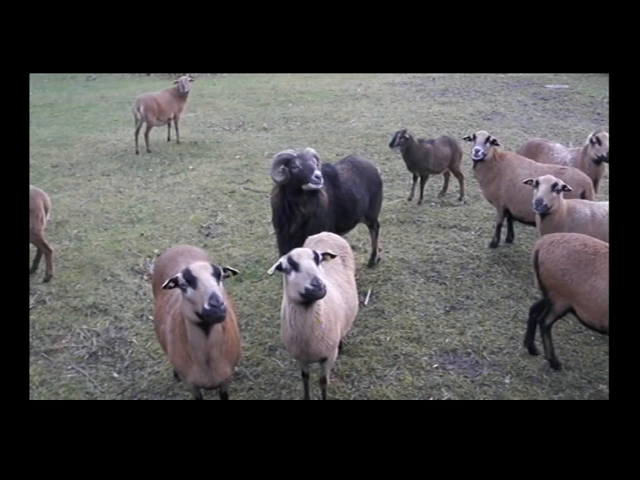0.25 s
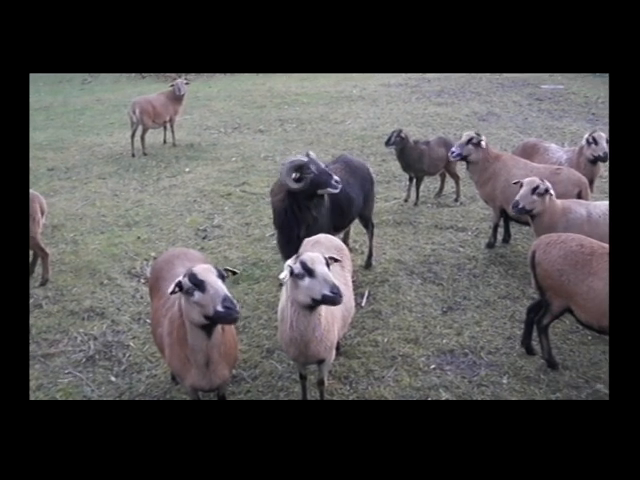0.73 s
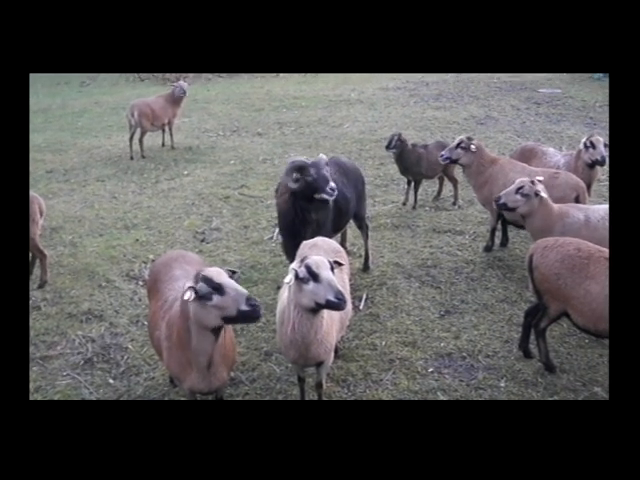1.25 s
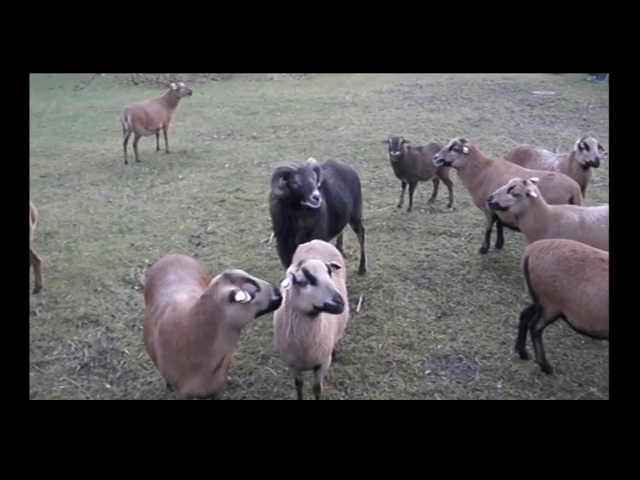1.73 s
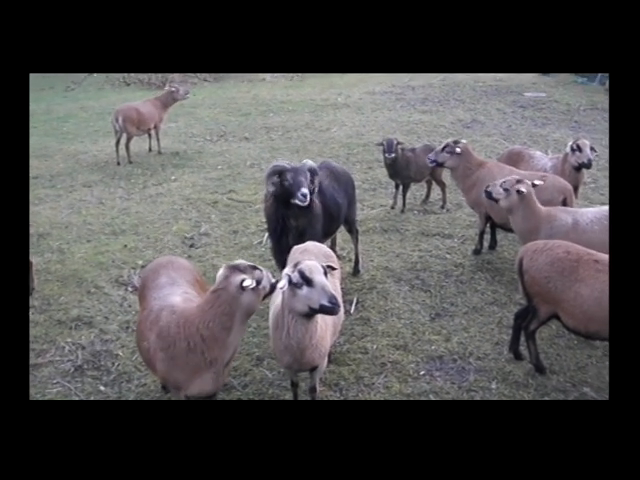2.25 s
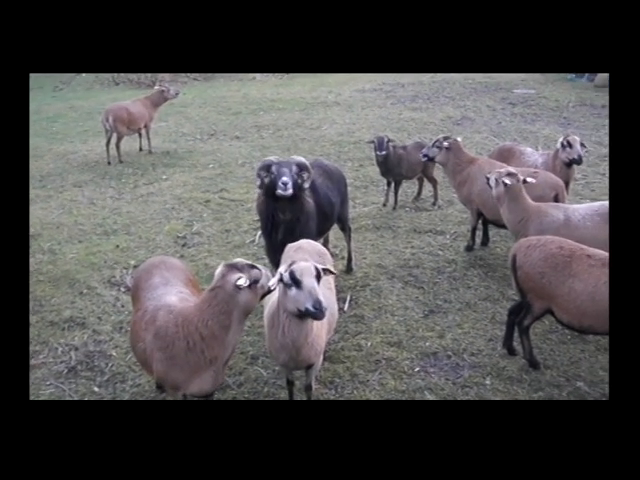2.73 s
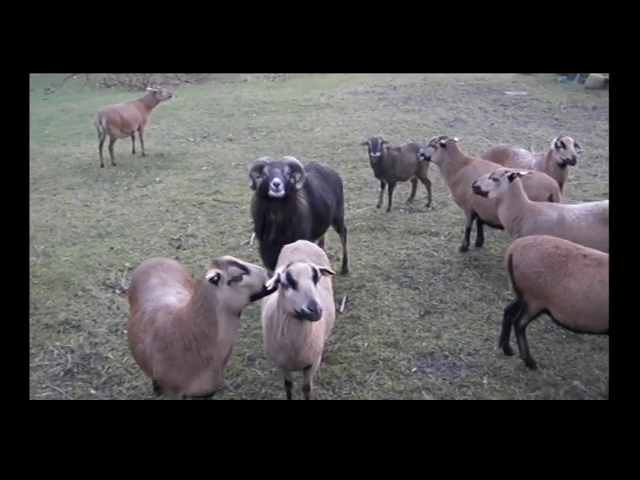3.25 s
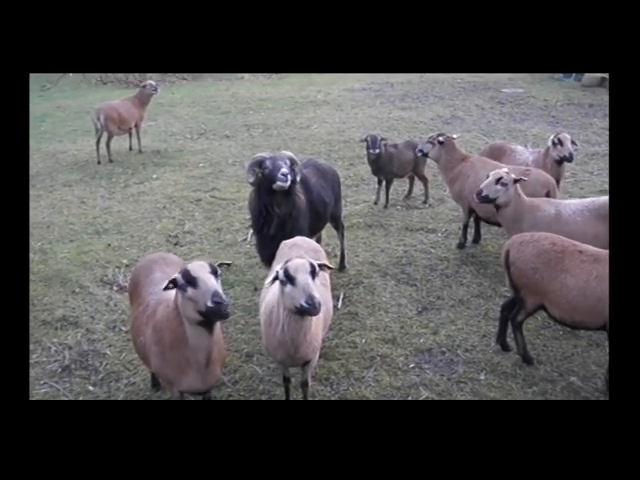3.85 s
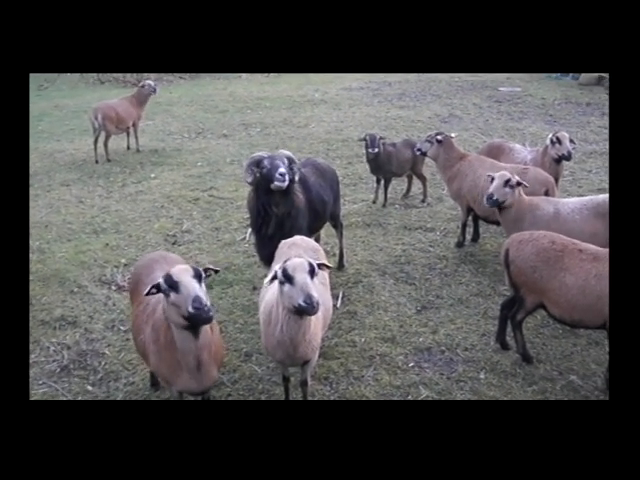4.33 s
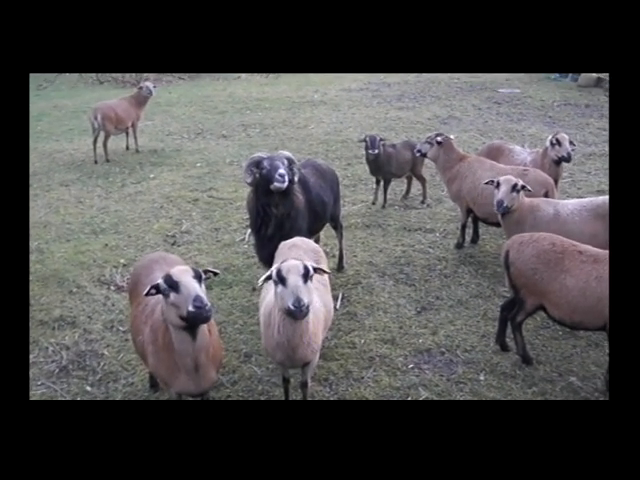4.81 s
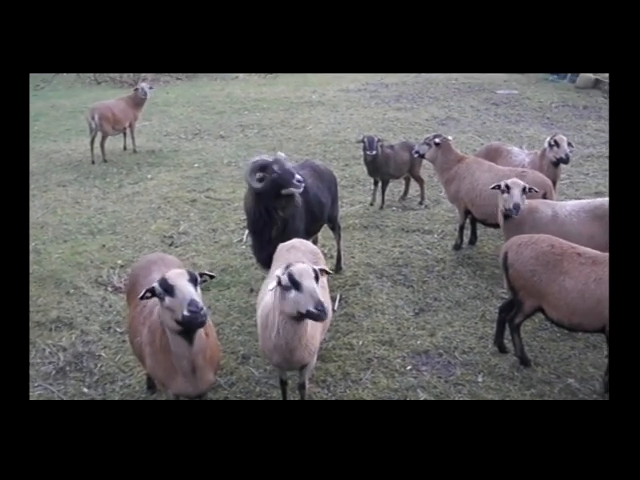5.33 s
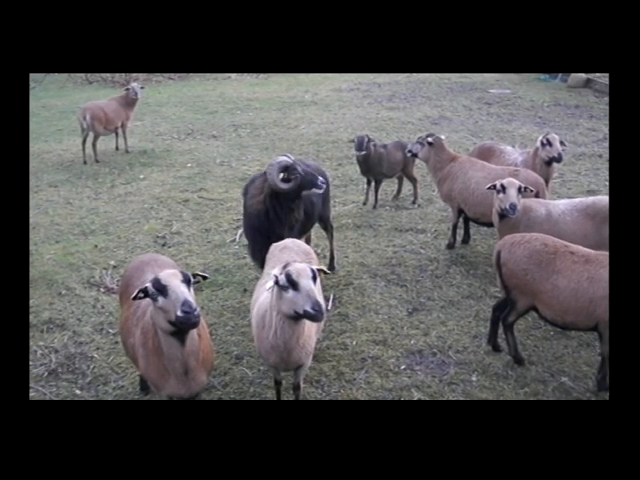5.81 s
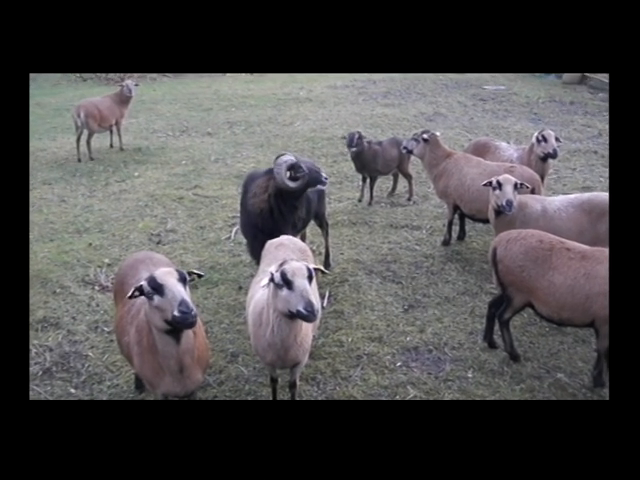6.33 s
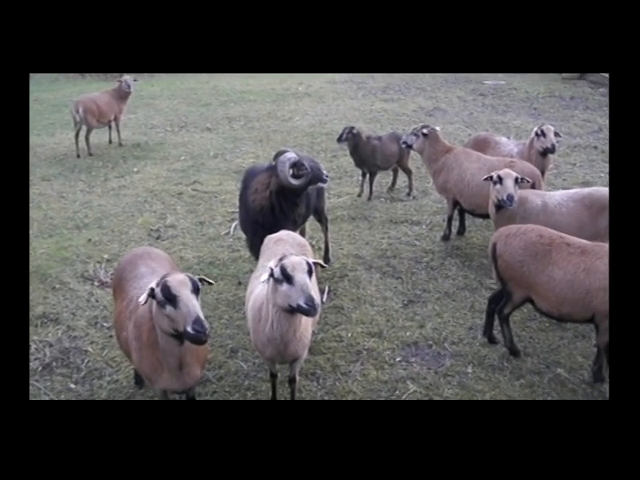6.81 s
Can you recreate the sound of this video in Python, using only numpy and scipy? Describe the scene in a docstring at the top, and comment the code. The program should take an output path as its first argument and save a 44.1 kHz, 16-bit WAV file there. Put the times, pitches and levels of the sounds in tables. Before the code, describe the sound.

In a quiet open pasture, a close sheep grunts and hums through its nose, then breaks into a loud, raspy, quavering baa. A deeper, steadier bleat answers from farther off, then a thin, hoarse, distant call. Afterwards only sparrow-like chirps, thin bird whistles, rustling grass, dry ticks and a few dull hoof thuds remain over soft outdoor air and a faint electronic-like whine.

```python
"""Two sheep in a pasture

A near sheep hums, then opens into a bright, quavering baa; a deeper one answers evenly: snaps ring formants.
A thin, hoarse far call follows: quavering partials and noise. Birds chirp and whistle: gliding sines.
Hooves thud and stalks tick: decaying noise bursts. Behind lie coloured air, rustling grass and a faint whine."""
import sys
import numpy as np
from scipy import signal
from scipy.fft import rfft, irfft, next_fast_len
from scipy.io import wavfile
from scipy.ndimage import uniform_filter1d, map_coordinates

SR = 44100
rng = np.random.default_rng(int(sys.argv[2]) if len(sys.argv) > 2 else 0)


def int16_out(signal):
    """Quantize to a 16-bit WAV file."""
    q = np.round(np.clip(np.atleast_2d(signal).T, -1, 1) * 32767)
    wavfile.write(sys.argv[1], SR, q.astype(np.int16))


N = 311787
TOP_HZ = 15820


def amp(db):
    """Decibels to gain."""
    return 10 ** (np.asarray(db) / 20)


def unit(x):
    """Scale to rms 1."""
    return x / np.sqrt(np.mean(x ** 2) + 1e-20)


def along(points, hz):
    """Interpolate (frequency, value) points on a log frequency axis."""
    f, v = np.transpose(points)
    return np.interp(np.log(hz + 1), np.log(f), v)


def curves(rows, t):
    """Each column of a curve table at the times t."""
    s, *cols = np.transpose(rows)
    return [np.interp(t, s, c) for c in cols]


def wobble(rate_hz, size):
    """Smooth random curve through rate_hz random knots a second."""
    knots = rng.standard_normal(int(size * rate_hz / SR) + 4)
    return map_coordinates(knots, [np.arange(size) * rate_hz / SR])


def filtered(x, response):
    """Multiply the spectrum of x by a response of frequency."""
    m = next_fast_len(len(x) + 8192)
    spectrum = rfft(x, m) * response(np.fft.rfftfreq(m, 1 / SR))
    return irfft(spectrum, m)[:len(x)]


def noise(spectrum, size):
    """Coloured noise of rms 1."""
    return unit(filtered(rng.standard_normal(size), lambda hz: amp(along(spectrum, hz))))


def causal(db):
    """Minimum-phase responses, which ring after the blow, one per row of dB gains."""
    cepstrum = irfft(np.log(amp(db)))
    half = cepstrum.shape[-1] // 2
    cepstrum[:, 1:half] *= 2
    cepstrum[:, half + 1:] = 0
    return np.exp(rfft(cepstrum))


def add(track, s, sound):
    """Mix a sound in at time s."""
    room = track[int(s * SR):][:len(sound)]
    room += sound[:len(room)]


# decay of the field's echoes: (frequency [Hz], time to fall 60 dB [s])
FIELD_DECAY = [(200, 0.69), (800, 0.46), (3000, 0.81), (5500, 0.89), (10000, 0.063)]


def outdoors(x, wet_db):
    """Trees and sheds round the field send back a faint, diffuse tail."""
    hz, t, z = signal.stft(rng.standard_normal(SR), SR, nperseg=256)
    decay = amp(-60 * t / along(FIELD_DECAY, hz)[:, None])
    tail = signal.istft(z * decay, SR, nperseg=256)[1]
    tail = tail / np.linalg.norm(tail)
    return x + amp(wet_db) * signal.fftconvolve(x, tail)[:N]


LIPS_S, FADE_DB_PER_S = 0.0095, 954  # time the lips take to part; speed of voice onset and end


def opening(times, jaw, shut, wide):
    """A bleat starts as a hum; lips part, jaw drops and starts back: (time s, jaw tuning Hz, mouth open 0-1)."""
    start, parts, stop = times
    narrow_hz, wide_hz, drop_s = jaw
    t = np.arange(start - .025, stop + .022, 1 / SR)
    swing = np.sin(np.pi / 2 * np.maximum(t - parts, 0) / drop_s)
    jaw_hz = narrow_hz + (wide_hz - narrow_hz) * swing
    mouth = np.interp(t, [parts - LIPS_S / 2, parts + LIPS_S / 2], [shut, wide])
    return t, jaw_hz, np.clip(mouth, 0, 1)


def fade(t, times):
    """dB lost before the voice starts and after it stops."""
    return FADE_DB_PER_S * np.abs(t - np.clip(t, times[0], times[2]))


def push(t, times, bands):
    """The hum swells, leaps as the lips part and sags as the air runs out: dB for each band."""
    since = t - times[1]
    parted = np.clip(since / LIPS_S + .5, 0, 1)
    levels = []
    for hum_db, swell, open_db, sag in bands:
        hum = (1 - parted) * (hum_db + swell * since)
        baa = parted * (open_db - sag * since)
        levels.append(hum + baa - fade(t, times))
    return levels


def catches(t, rows, width_s, lead_s):
    """At each catch in the throat the rasp fades, then the pitch leaps: (leap Hz, dip dB)."""
    def bump(s):
        return np.exp(-((t - s) / width_s) ** 2)

    leap_hz = sum(hz * bump(s) for s, hz, db in rows)
    dip_db = sum(db * bump(s - lead_s) for s, hz, db in rows)
    return leap_hz, dip_db


# voice through closed lips: (frequency [Hz], level [dB])
CLOSED_LIPS = [(140, -35.5), (300, -38), (430, -64), (600, -27), (850, -29.5), (1200, -36), (1550, -59),
               (2100, -50), (2900, -67.5), (4600, -56), (6100, -40), (7000, -55.5), (10500, -43),
               (15500, -57)]
# air noise in the voice: (frequency [Hz], weight [ratio])
BREATHY = [(300, .1), (900, .1), (3000, .35), (6000, 1.2), (11000, 2.2)]


def bleat(t, pitch, jaw, mouth, effort, formants, lift, slope, nose, roughness, size=2048):
    """Every snap of the vocal folds, with its puff of air, rings the throat in its shape of that moment."""
    jitter, shimmer_db, open_rough, closed_rough, puff_s = roughness
    cycles = np.cumsum(pitch) / SR
    at = np.interp(np.arange(1, int(cycles[-1])), cycles, t)
    period = np.gradient(at)
    jaw, mouth = [np.interp(at, t, c)[:, None] for c in (jaw, mouth)]
    chance = rng.standard_normal((len(at), 3))
    at = at + np.cumsum(jitter * period * chance[:, 0])
    hz = np.fft.rfftfreq(size, 1 / SR)

    def peak(centre, half_width_hz):
        return 1 / (1 + ((hz - centre) / half_width_hz) ** 2)

    # formants slide with the jaw; soft tissue keeps them from ringing long
    least_width_hz, lifted_above_hz = 135, 2500
    lifted = 1 + lift * (at - at.mean())[:, None]
    vowel = along(slope, hz)
    for f, half_width_hz, db, follow in formants:
        centre = f * (jaw / formants[0][0]) ** follow * (lifted if f > lifted_above_hz else 1)
        vowel = vowel + db * peak(centre, max(half_width_hz, least_width_hz))
    hum = along(CLOSED_LIPS, hz)
    for s, half_length_s, f, half_width_hz, db in nose:
        hum = hum + db * np.exp(-((at[:, None] - s) / half_length_s) ** 4) * peak(f, half_width_hz)

    # tongue and lips never hold still, so the finer resonances drift
    drift = uniform_filter1d(rng.standard_normal(vowel.shape), size=12, axis=0)
    drift = unit(uniform_filter1d(drift, size=14, axis=1))
    drift_db = drift * along([(700, .4), (2000, 1.3), (5000, 1.8)], hz)
    shape = mouth * vowel + (1 - mouth) * hum + drift_db

    # effort sets throat tone, ring and rasp; the rasp is the least steady
    levels = np.transpose([np.interp(at, t, db) for db in effort]) + shimmer_db * chance[:, 1:2]
    levels[:, 2] += 2 * shimmer_db * chance[:, 2]
    power = []
    for lo, hi in [(400, 1200), (1200, 4200), (4200, 15000)]:
        band = amp(shape)[:, (hz > lo) & (hz < hi)]
        power.append(2 * np.sum(band ** 2, axis=1) / (size * period * SR))
    gains = levels - 10 * np.log10(np.transpose(power))
    knees_hz = [1000, 1400, 3500, 5000]
    shape = shape + [np.interp(hz, knees_hz, np.repeat(g, 2)[1:-1]) for g in gains]

    # the folds zip shut, so the treble of each snap comes a little late
    late_s = .0003 * hz / TOP_HZ
    subsample_s = (at * SR % 1)[:, None] / SR
    snap = -np.exp(-2j * np.pi * hz * (subsample_s + late_s))
    # air rushes through after each snap, mostly in the treble
    puff_decay = np.exp(-np.arange(size) / SR / puff_s)
    puff = rfft(rng.standard_normal((len(at), size)) * puff_decay)
    puff = puff / np.sqrt(np.mean(np.abs(puff) ** 2))
    share = (mouth * open_rough + (1 - mouth) * closed_rough) * along(BREATHY, hz)
    share = np.minimum(share, 1)
    source = np.sqrt(1 - share) * snap + np.sqrt(share) * puff

    voice = np.zeros(N)
    lead = 64  # samples of run-up before each snap
    for s, ring in zip(at, irfft(source * causal(shape))):
        add(voice, s - lead / SR, np.roll(ring, lead))
    return voice


# base pitch: (time [s], pitch [Hz])
NEAR_PITCH = [(.72, 141.9), (.75, 140), (.78, 109), (.825, 135.6), (.9, 148.3), (1.03, 144.7),
              (1.12, 146.2), (1.33, 139.5), (1.41, 131.6)]
# catches in the throat: (time [s], pitch leap [Hz], rasp dip [dB])
NEAR_CATCHES = [(1.069, 43.7, 14), (1.161, 48, 8), (1.204, 10.2, 16), (1.255, 28, 8), (1.315, 3.1, 15)]
# (voice starts [s], lips part [s], voice stops [s])
NEAR_TIMES = (.734, 0.96, 1.3832)
# jaw tuning: (as the lips part [Hz], at the widest [Hz], time to get there [s])
NEAR_JAW = (566, 776, 0.26)
# rows throat tone, ring, rasp: (hum as lips part [dB], swell [dB/s], open as lips part [dB], sag [dB/s])
NEAR_EFFORT = [(-36, 30.5, -22.5, 7.5), (-39, -1, -22, 14), (-37, 42, -26.5, 8)]
# throat resonances: (frequency [Hz], half width [Hz], level [dB], exponent of following the jaw)
NEAR_FORMANTS = [(720, 192, 20, 0.9), (1575, 174, 20.5, 0.3), (2110, 130, 4.5, 1), (2816, 118, 25, 0.12),
                 (3440, 95, 14.5, 0.06), (4400, 110, 6.5, 0.1), (5210, 280, 9.5, 0), (6250, 840, 14, 0)]
# voice spectrum under the formants: (frequency [Hz], level [dB])
NEAR_SLOPE = [(140, -55), (300, -58.5), (440, -58.5), (600, -45.5), (900, -47.5), (1150, -61.5),
              (1500, -56), (2500, -54), (4200, -54), (6800, -64.5), (10500, -59), (12500, -65.5),
              (15500, -68)]
# nostril whistles in the hum: (time [s], half length [s], frequency [Hz], half width [Hz], level [dB])
NEAR_NOSE = [(0.848, 0.056, 3730, 100, 27), (0.916, 0.0067, 4000, 140, 19), (0.937, 0.034, 3630, 140, 21.5)]
# (period jitter [ratio], shimmer [dB], air share open [ratio], air share closed [ratio], puff decay [s])
NEAR_ROUGH = (.0075, .65, .19, .45, .0055)
# high resonance flaring as the lips part: (frequency [Hz], half width [Hz], level [dB], fading time [s])
NEAR_SIZZLE = (10200, 900, 7.9, 0.18)
# puffs through the nostrils: (time [s], half length [s], level [dB])
SNORTS = [(.775, 0.022, -41.5), (0.833, 0.0069, -32.5), (0.902, 0.013, -34), (0.922, 0.0047, -30.5)]
# colour of the puffs: (frequency [Hz], level [dB])
SNORT_AIR = [(1500, -6), (3800, -6), (5000, -12), (6200, -5), (9500, 5), (14000, -2), (15500, -11)]
NEAR_LIFT_PER_S = .17  # the throat shortens through the call and lifts the upper formants
FALTER_S, FALTER_LENGTH_S, FALTER_DB = .779, 0.013, 16  # the hum nearly stalls after its first grunt


def near_sheep():
    """It grunts, falters and hums with snorts through its nose, then opens into a quavering baa."""
    t, jaw, mouth = opening(NEAR_TIMES, NEAR_JAW, shut=0.083, wide=0.85)
    leap_hz, dip_db = catches(t, NEAR_CATCHES, width_s=.0081, lead_s=0.018)
    falter_db = FALTER_DB * np.exp(-((t - FALTER_S) / FALTER_LENGTH_S) ** 2)
    throat, ring, rasp = push(t, NEAR_TIMES, NEAR_EFFORT) - falter_db
    rasp = rasp - dip_db - fade(t, NEAR_TIMES)  # the rasp dies first
    effort = [throat, ring - 0.18 * dip_db, rasp]
    pitch = curves(NEAR_PITCH, t)[0] + leap_hz
    voice = bleat(t, pitch, jaw, mouth, effort, NEAR_FORMANTS, NEAR_LIFT_PER_S, NEAR_SLOPE,
                  NEAR_NOSE, NEAR_ROUGH)

    sizzle_hz, half_width_hz, sizzle_db, fading_s = NEAR_SIZZLE
    clock = np.arange(N) / SR
    since = clock - NEAR_TIMES[1]
    flare = amp(sizzle_db * (since > 0) * np.exp(-(since / fading_s) ** 2)) - 1
    sizzle = filtered(voice, lambda hz: np.exp(-((hz - sizzle_hz) / half_width_hz) ** 2))
    voice = voice + flare * sizzle

    puffs = sum(amp(db) * np.exp(-((clock - s) / length) ** 2) for s, length, db in SNORTS)
    return outdoors(voice + puffs * noise(SNORT_AIR, N), wet_db=-27)


# pitch: (time [s], pitch [Hz])
DEEP_PITCH = [(2.03, 100.3), (2.072, 115.8), (2.084, 117.9), (2.198, 132.3), (2.374, 136.1), (2.482, 137.5),
              (2.534, 136.1), (2.566, 130.4), (2.592, 133.6), (2.636, 133.4), (2.664, 130.5),
              (2.706, 134.2), (2.735, 124.6)]
# (voice starts [s], lips part [s], voice stops [s])
DEEP_TIMES = (1.99, 2.068, 2.725)
# jaw tuning: (as the lips part [Hz], at the widest [Hz], time to get there [s])
DEEP_JAW = (698, 751, 0.5)
# rows throat tone, ring: (hum as lips part [dB], swell [dB/s], open as lips part [dB], sag [dB/s])
DEEP_EFFORT = [(-41.5, 184, -32.5, 3.5), (-44.5, 110, -32.5, 5)]
# treble of the voice, before a 0.3 dB cut: (time [s], level [dB])
DEEP_RASP = [(2.01, -63), (2.088, -45.5), (2.2, -54.5), (2.268, -46.5), (2.43, -53.5), (2.522, -47.5),
             (2.536, -55), (2.558, -44), (2.678, -41), (2.725, -47)]
# throat resonances: (frequency [Hz], half width [Hz], level [dB], exponent of following the jaw)
DEEP_FORMANTS = [(763, 108, 30.5, 0.73), (1440, 150, 16, -3.1), (2315, 120, 14.5, 0.24),
                 (2830, 60, 22, 0.17), (3200, 120, 21, 0.17), (5070, 590, 24, 0.55)]
# voice spectrum under the formants: (frequency [Hz], level [dB])
DEEP_SLOPE = [(135, -52), (270, -53), (410, -44.5), (550, -56.5), (950, -54), (1230, -54.5), (1800, -62.5),
              (2600, -63.5), (3700, -60.5), (4300, -67), (6200, -66), (10500, -68.5), (15500, -72)]
# (period jitter [ratio], shimmer [dB], air share open [ratio], air share closed [ratio], puff decay [s])
DEEP_ROUGH = (.0016, .4, .115, .55, .011)
DEEP_LIFT_PER_S = 0.047  # rise of the upper formants


def deep_sheep():
    """It stands farther off and holds its note; where it grows raspy it also rings more."""
    t, jaw, mouth = opening(DEEP_TIMES, DEEP_JAW, shut=.02, wide=0.66)
    throat, ring = push(t, DEEP_TIMES, DEEP_EFFORT)
    rasp, = curves(DEEP_RASP, t)
    ring = ring + 0.19 * (rasp - np.median(rasp))
    effort = [throat, ring, rasp - fade(t, DEEP_TIMES) - .3]
    pitch, = curves(DEEP_PITCH, t)
    voice = bleat(t, pitch, jaw, mouth, effort, DEEP_FORMANTS, DEEP_LIFT_PER_S, DEEP_SLOPE,
                  [], DEEP_ROUGH)
    return outdoors(voice, wet_db=-16)


# pitch: (time [s], pitch [Hz])
FAR_PITCH = [(3.04, 751), (3.12, 820), (3.18, 714), (3.26, 698.4), (3.3, 867), (3.345, 934), (3.38, 866),
             (3.5, 630)]
# hoarse noise: (starts [s], full [s], wanes [s], gone [s]); the quaver peaks at "full"
FAR_TIMES = (3.0, 3.272, 3.35, 3.56)
# colour of the hoarse noise: (frequency [Hz], level [dB])
HOARSE = [(290, -20), (500, -13), (883, -7.5), (1210, -15), (1560, -14.5), (2920, -15), (3720, -13.5),
          (7160, -20), (7910, -27), (9790, -16), (15000, -21)]
FAR_QUAVER_HZ, FAR_QUAVER_DB = 17.6, 4


def far_call():
    """A thin tone that swells and breaks up as it quavers, with ragged overtones and hoarse noise."""
    t = np.arange(N) / SR
    pitch = curves(FAR_PITCH, t)[0] * (1 + 0.0306 * wobble(220, N))
    phase = 2 * np.pi * np.cumsum(pitch) / SR
    ragged_db = 3.5
    tone = np.zeros(N)
    for k, level_db in enumerate([4.5, -5, -5.5, -14, -14], 1):
        tone += amp(level_db + ragged_db * wobble(60, N)) * np.sin(k * phase)
    swell = np.interp(t, FAR_TIMES, [0, 1, 1, 0])
    voiced = np.interp(t, [3.04, 3.09, 3.39, 3.49], [0, 1, 1, 0])
    quaver_db = FAR_QUAVER_DB * np.cos(2 * np.pi * FAR_QUAVER_HZ * (t - FAR_TIMES[1]))
    hoarse = unit(amp(2.1 * wobble(45, N)) * noise(HOARSE, N))
    call = amp(quaver_db - 52.5) * voiced * unit(tone) + amp(-50) * swell * hoarse
    return outdoors(call, wet_db=-8.5)


# sparrow-like chirps:
# (time of top [s], rise [s], fall [s], top pitch [Hz], end pitch [Hz], level [dB], roughness [about 0-1])
CHIRPS = [(.256, 0.019, 0.064, 4225, 2234, -47.5, 1.02), (1.44, 0.022, 0.046, 4210, 2606, -49, 1),
          (3.036, .018, 0.061, 4180, 2280, -47, 0.91), (4.234, .02, 0.054, 3355, 3010, -53.5, 0.42),
          (5.038, .018, 0.026, 3450, 2600, -57, 0.42), (6.466, 0.091, .06, 4090, 2600, -41, 0.66)]
# loudness over a chirp: (place in the arch [-1 start, 0 top, 1 end], level [dB])
CHIRP_SWELL = [(-0.89, -5), (-0.6, -8), (-0.11, 0.5), (0.57, 0), (1, -1)]
# beak resonance: (frequency [Hz], level [dB])
BEAK = [(1500, -3), (2500, -4.5), (3800, 2), (4800, -2.5), (6300, -13), (7600, -25), (12000, -30)]
CHIRP_CLIMB = .52  # share of the top pitch climbed
CHIRP_RISE_CURVE, CHIRP_FALL_CURVE = 1.4, 1.15  # exponents: roundness of each flank


def chirps():
    """Each climbs with strong overtones, drops almost pure, beak-shaped; harsh ones break into strokes."""
    song = np.zeros(N)
    for s, rise, fall, top_hz, end_hz, db, rough in CHIRPS:
        t = np.arange(-rise, fall, 1 / SR)
        u = np.where(t < 0, t / rise, t / fall)
        climb_hz = CHIRP_CLIMB * top_hz * np.abs(u) ** CHIRP_RISE_CURVE
        drop_hz = (top_hz - end_hz) * np.abs(u) ** CHIRP_FALL_CURVE
        arch = top_hz - np.where(t < 0, climb_hz, drop_hz)
        overtones = amp(np.interp(u, [-.5, .3], [2, -14]))
        note = np.zeros(len(t))
        for ratio, gain in [(1, 1), (1 - .18 * rough, rough)]:  # the two sides of the syrinx
            hz = ratio * arch * (1 + .09 * rough ** 2 * wobble(600, len(t)))
            phase = 2 * np.pi * np.cumsum(hz) / SR
            for k in (1, 2, 3):
                beak_gain = amp(along(BEAK, k * ratio * arch))
                note += gain * (overtones if k > 1 else 1) * beak_gain * np.sin(k * phase)
        strokes = amp(3.5 * rough ** 2 * wobble(250, len(t)))
        swell = amp(curves(CHIRP_SWELL, u)[0]) * np.sqrt(np.abs(1 - u ** 4))
        add(song, s - rise, amp(db) * unit(note * strokes * swell))
    return outdoors(song, wet_db=-16.0)


# farther birds: (time [s], length [s], start pitch [Hz], end pitch [Hz], level before the swell [dB])
WHISTLES = [(.399, .022, 6000, 7200, -60), (.427, 0.079, 4280, 4520, -61), (0.481, 0.062, 3830, 3990, -57),
            (0.564, 0.028, 3000, 2830, -55.5), (.606, .07, 4180, 4350, -61),
            (0.648, 0.042, 5100, 3400, -59), (1.58, .08, 4000, 5000, -62),
            (1.683, 0.057, 6040, 4450, -58.5), (3.798, .055, 1890, 2250, -58.5),
            (3.853, 0.035, 1235, 2250, -60), (3.878, .032, 2250, 1950, -57),
            (4.168, .047, 4920, 2840, -55.5), (5.05, .074, 2960, 4100, -56.5),
            (5.256, .089, 5300, 4400, -60.5), (5.384, .062, 3620, 4440, -58.5),
            (5.523, 0.059, 5400, 4500, -62), (5.665, .061, 4040, 4300, -64), (5.994, 0.06, 7740, 6880, -54)]


def whistles():
    """Thin whistles of farther birds: short, nearly pure glides."""
    song = np.zeros(N)
    for s, length, start_hz, end_hz, db in WHISTLES:
        u = np.linspace(0, 1, int(length * SR))
        glide_hz = start_hz * (end_hz / start_hz) ** u * (1 + .012 * wobble(300, len(u)))
        tone = unit(np.sin(2 * np.pi * np.cumsum(glide_hz) / SR))
        swell = np.abs(np.sin(np.pi * u)) ** .8
        add(song, s, amp(db) * tone * swell)
    return outdoors(song, wet_db=-14)


# hooves on turf: (time [s], peak level before a 7 dB lift [dB])
THUDS = [(1.77, -50.5), (1.83, -61), (5.418, -48), (5.469, -53.5), (5.678, -56), (5.929, -50.5),
         (6.22, -54.5)]


def hooves():
    """Hooves land with dull thuds: low noise with a soft onset and a decay."""
    steps, t = np.zeros(N), np.arange(SR // 5) / SR
    thud_spectrum = [(25, -6), (60, 4.5), (130, -6.0), (300, -22.5), (1500, -62)]
    for s, db in THUDS:
        decay = amp(-60 * t / 0.31)
        onset = 1 - np.exp(-t / 0.0018)
        thud = noise(thud_spectrum, len(t)) * decay * onset
        add(steps, s, amp(db + 7) * thud / np.abs(thud).max())
    return steps


# dry stalks snapping: (time [s], peak level [dB], pitch [Hz])
TICKS = [(0.645, -38.5, 2600), (1.454, -34.5, 9000), (1.964, -36.5, 6200), (3.8, -34, 2100),
         (4.018, -40, 5900), (5.676, -40, 1600), (5.918, -41, 10000), (5.934, -40, 9900),
         (6.0075, -36.5, 9700), (6.914, -37, 10200)]


def stalks():
    """Stalks snap with short bright ticks: noise round a pitch, falling 60 dB in 20 ms."""
    snaps, t = np.zeros(N), np.arange(SR // 5) / SR
    for s, db, hz in TICKS:
        tick = noise([(hz / 6, -12), (hz, 0), (hz * 3, -10)], len(t)) * amp(-60 * t / .02)
        add(snaps, s, amp(db) * tick / np.abs(tick).max())
    return snaps


# rustling: (time [s], level [dB])
GRASS = [(0, -56), (.2, -60), (.5, -62.5), (1.7, -68), (2.9, -59), (3.7, -62.5), (5.2, -68.5), (5.9, -65),
         (6.3, -65.5), (7.07, -65)]


def grass():
    """The flock rustles in the grass: treble noise broken up by fast random gain."""
    grass_db, = curves(GRASS, np.arange(N) / SR)
    crackle = amp(2.5 * wobble(25, N) + 3 * wobble(500, N))
    hiss = noise([(800, 19), (3000, 11), (6000, 10.5), (10500, 12), (15500, -32)], N)
    return amp(grass_db) * unit(crackle * hiss)


# colour of the outdoor air: (frequency [Hz], level [dB])
AIR = [(15, -47), (25, -15), (55, -4.5), (88, -1), (139, -6), (200, -5), (350, -7), (1020, -10.5),
       (1400, -17), (1920, -18), (3610, -21.5), (6800, -25), (10000, -23), (15500, -25.5)]
AIR_DB = -55.65


def open_air():
    """Quiet outdoor air: low-weighted noise that wavers slightly."""
    return amp(AIR_DB + 0.48 * wobble(6.7, N)) * noise(AIR, N)


# steady thin tones: (frequency [Hz], level [dB])
WHINE = [(5890, -71), (9880, -74), (1970, -75)]


def whine():
    """A faint whine: sines whose phase wanders."""
    t = np.arange(N) / SR
    tones = np.zeros(N)
    for hz, db in WHINE:
        tones += amp(db) * unit(np.sin(2 * np.pi * hz * t + 0.38 * wobble(30, N)))
    return tones


def gain_control(x, threshold_db, depth_db, release_s):
    """Loud sound pulls the gain down quickly; it creeps back afterwards."""
    loud = uniform_filter1d(x ** 2, SR // 50) > amp(threshold_db) ** 2
    t = np.arange(N) / SR
    since = t - np.maximum.accumulate(np.where(loud, t, -np.inf))
    pull = uniform_filter1d(np.exp(-since / release_s), SR // 100)
    return x * amp(-depth_db * pull)


def scene():
    """All that sounds in the field."""
    sheep = near_sheep() + deep_sheep() + far_call()
    birds = chirps() + whistles()
    ground = hooves() + stalks() + grass()
    return (sheep + birds + ground + open_air())[None]


# dulled bands: (frequency [Hz], half width [Hz], level [dB])
NOTCHES = [(7880, 380, -20), (11900, 250, -12)]


def record(dry):
    """Ride the gain, dull two narrow bands, add the whine and keep nothing above TOP_HZ."""
    ridden = gain_control(dry[0], threshold_db=-22.5, depth_db=5, release_s=0.4)

    def dulling(hz):
        return amp(sum(db * np.exp(-((hz - f) / w) ** 2) for f, w, db in NOTCHES))

    coloured = filtered(ridden, dulling)
    return filtered(coloured + whine(), lambda hz: hz < TOP_HZ)[None]


dry = scene()
out = record(dry)
int16_out(out)
```